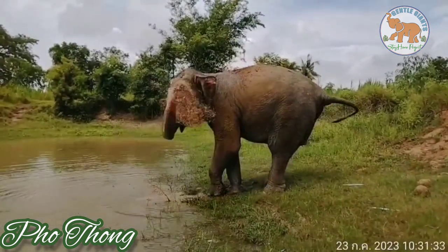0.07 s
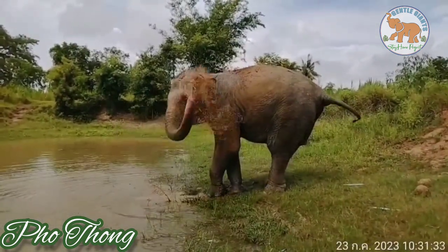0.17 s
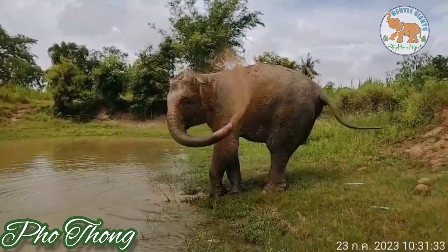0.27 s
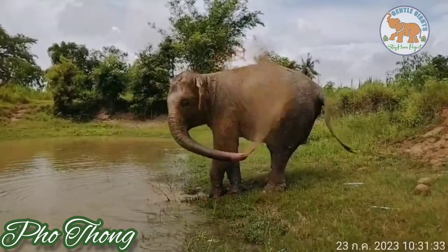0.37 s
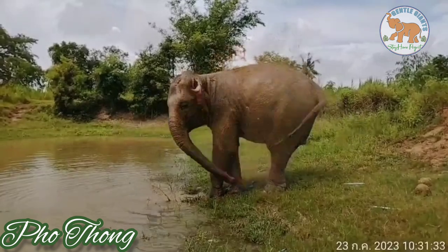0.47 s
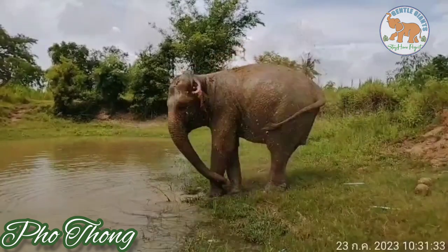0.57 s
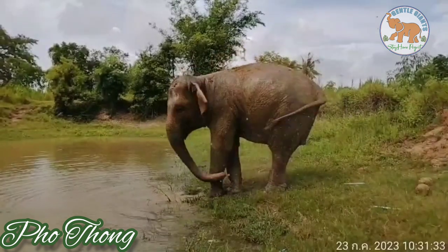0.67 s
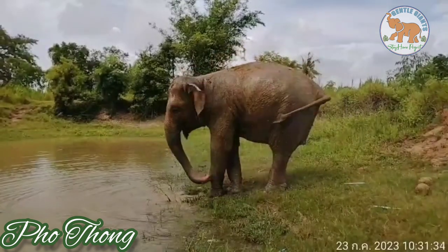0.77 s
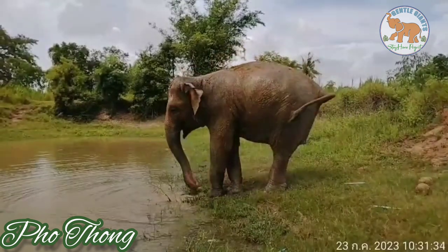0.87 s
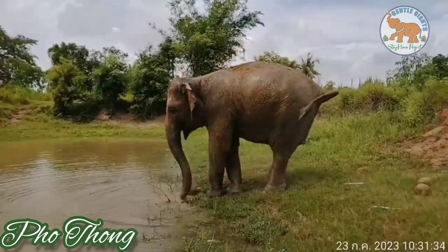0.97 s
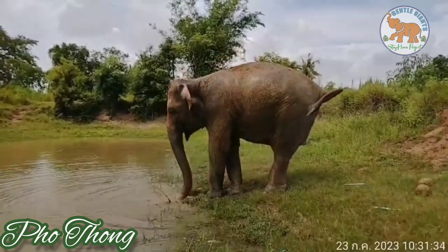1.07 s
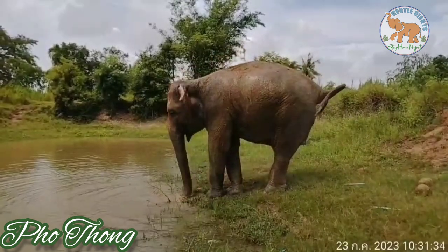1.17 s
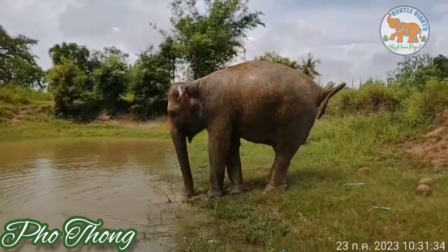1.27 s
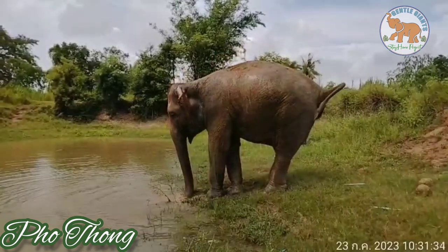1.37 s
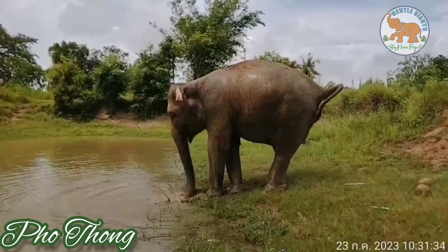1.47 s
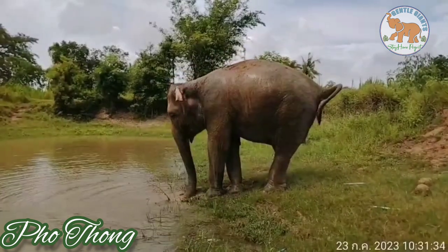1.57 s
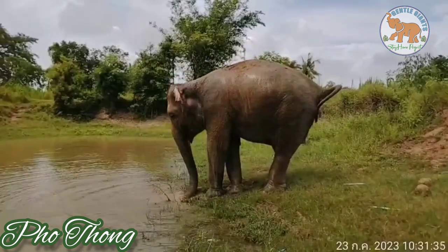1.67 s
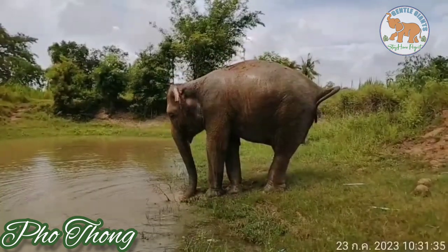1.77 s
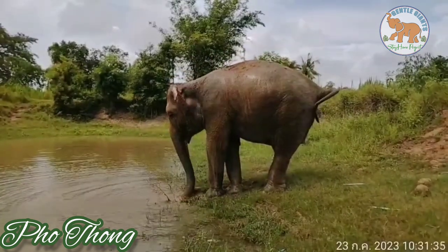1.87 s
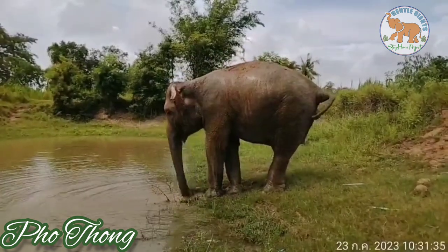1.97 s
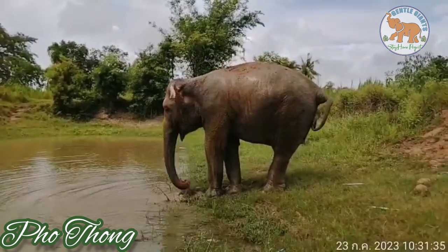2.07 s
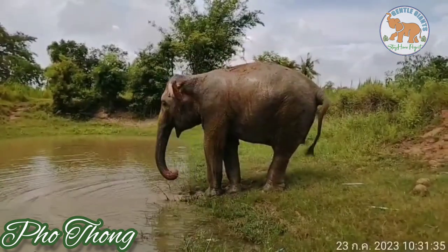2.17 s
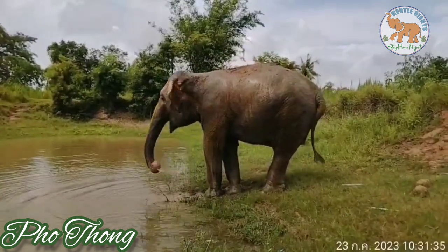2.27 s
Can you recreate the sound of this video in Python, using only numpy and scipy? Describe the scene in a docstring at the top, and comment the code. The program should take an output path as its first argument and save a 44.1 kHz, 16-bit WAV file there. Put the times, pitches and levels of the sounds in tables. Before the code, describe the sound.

Water splashes from an elephant's trunk: a soft gush, a sudden bright burst of spray, pattering drops, then wet slaps and sloshes in pond shallows, thinning to drips and a final small swish, outdoors, fairly close.

```python
"""Edge of a pond: an elephant flings muddy water over its back, a gush and then spray pattering down.
Its trunk slaps into the shallows, sloshes and dribbles there, and lifts with a last swish.
Water is random droplet clicks, shaped noise and short bubble rings; slaps and drips add ringing air pockets.
One sharp tick of damped modes sounds close by; wind is low noise over a faint hiss."""
import sys
import numpy as np
from scipy import signal
from scipy.fft import rfft, irfft
from scipy.io import wavfile

SR = 44100
rng = np.random.default_rng(int(sys.argv[2]) if len(sys.argv) > 2 else 0)


def wrap_up_sound(samples):
    """Save the sound to the file named by the first command line argument, as 16-bit audio."""
    columns = np.atleast_2d(samples).T
    # keep every value between -1 and 1, then stretch to whole-number steps
    tamed = np.clip(columns, -1, 1)
    steps = np.round(tamed * 32767).astype(np.int16)
    wavfile.write(sys.argv[1], SR, steps)


N = 101430
T = np.arange(N) / SR

# Spectrum of the mist that runs off. Each row: frequency in Hz, relative level in dB.
MIST_RUNOFF_COLOUR = [(3000, -25.5), (5600, -17), (6700, -7.5), (8000, 2), (9500, -4.5), (12000, -2.5),
                      (13300, -11), (14500, -5.5)]
# Spectrum of the coarser drops. Each row: frequency in Hz, relative level in dB.
DROPS_COLOUR = [(1000, -15), (2000, -15.5), (2700, -8), (3300, -2.5), (3900, -1), (4700, -6.5),
                (5600, -14.5), (8000, -12)]

MIST_PER_S, DROPS_PER_S = 7000, 1500
SPLASH_RISE_S, SPLASH_FALL_S, SPLASH_TAIL_S, SPLASH_TAIL_DB = 0.0005, 0.001, 0.0093, -10.5
SLAP_LENGTH_S, SLAP_FALL_S, SLAP_TAIL_S, SLAP_TAIL_DB = 0.0032, 0.0031, 0.023, -8.5
GRAIN_SPREAD_DB, SMOOTH_SHARE = 3.2, 0.45
CLUMP_DB, CLUMPS_PER_S, CLUMP_BANDS = 2.6, 60, 30
PLINKS_PER_S, PLINK_CYCLES, PLINK_SHARE = 500, 19, 0.16
BUBBLES_PER_S, BUBBLE_CYCLES, BUBBLE_SHARE = 450, 24, 0.9
CRACKLE_DB, CRACKLE_PER_S = 1.4, 220
WIDTH_DB, WIDE_ABOVE_HZ, WIDE_BELOW_HZ = -3, 6980, 12400
ECHO_SHARE = 0.43
HOLLOW_WIDTH_HZ = 85  # rate of the random amplitude knots
CAVITY_T60_S, CAVITY_RISE_PER_S = 0.036, 1.5
DRIP_T60_S, DRIP_RISE_PER_S = 0.014, 12
JET_S, JET_LENGTH_S, JET_DB = 0.276, 0.024, -29
TICK_S = 2.0542
AIR_DB = -76
CUTOFF_HZ = 14300


def from_db(db):
    """Decibels to amplitude gain."""
    return 10 ** (np.asarray(db) / 20)


def rms_one(x):
    """Scale to unit power."""
    return x / np.sqrt(np.mean(x ** 2) + 1e-20)


def gains(rows):
    """Each dB column of a curve as a gain per sample."""
    s, *columns = np.transpose(rows)
    return [from_db(np.interp(T, s, db)) for db in columns]


def coloured(x, points):
    """Filter a steady texture by a dB curve over log frequency; unit power."""
    hz, db = np.transpose(points)
    f = np.maximum(np.arange(N // 2 + 1) * SR / N, 1)
    gain = from_db(np.interp(np.log(f), np.log(hz), db))
    return rms_one(irfft(rfft(x) * gain, N))


def ring(clicks, hz, t60):
    """Two-pole resonator: a unit click starts a dying cosine of height 1."""
    r = from_db(-60 / (t60 * SR))
    w = 2 * np.pi * hz / SR
    return signal.lfilter([1, -r * np.cos(w)], [1, -2 * r * np.cos(w), r * r], clicks + 1e-18)


def click(s):
    """One unit click at a time in seconds."""
    return 1.0 * (np.arange(N) == int(s * SR))


def impacts(per_s):
    """Random clicks of uneven size and either sign; unit power."""
    sizes = from_db(GRAIN_SPREAD_DB * np.minimum(rng.exponential(1, N), 4))
    signs = rng.choice([-1, 1], N)
    hits = rng.random(N) < per_s / SR
    return rms_one(sizes * signs * hits)


def clumped(x):
    """Drops of one size arrive in clumps: each band swells and sinks by chance."""
    root_hz = np.sqrt(np.arange(N // 2 + 1) / (N // 2))
    centres = np.linspace(0, 1, num=CLUMP_BANDS)
    knots = np.arange(0, N / SR + 1, 1 / CLUMPS_PER_S)
    spectrum = rfft(x)
    out = 0
    for centre in centres:
        weight = np.maximum(1 - abs(root_hz - centre) / centres[1], 0)
        band = irfft(spectrum * weight, N)
        shift_s = rng.random() / CLUMPS_PER_S
        swell = np.interp(T + shift_s, knots, rng.standard_normal(len(knots)))
        out = out + band * from_db(CLUMP_DB * swell)
    return out


def bubbles(per_s, low_hz, high_hz, cycles):
    """Small bubbles ring at scattered pitches, losing 60 dB in a set number of cycles; unit power."""
    pitches = np.geomspace(low_hz, high_hz, num=64)
    clicks = impacts(per_s)
    dealt = rng.integers(0, len(pitches), N)
    return rms_one(sum(np.sqrt(hz) * ring(clicks * (dealt == k), hz, cycles / hz)
                       for k, hz in enumerate(pitches)))


def widen(mid, side):
    """Add a treble-only side signal with opposite signs in the two ears."""
    high = signal.butter(8, WIDE_ABOVE_HZ, "high", fs=SR, output="sos")
    low = signal.butter(2, WIDE_BELOW_HZ, fs=SR, output="sos")
    side = signal.sosfilt(low, signal.sosfilt(high, side))
    return mid + from_db(WIDTH_DB) * side * np.array([[1], [-1]])


def patter(per_s, colour):
    """Droplet impacts and tiny plinks over a smooth hiss, wide in the treble."""
    def one():
        grains = clumped(impacts(per_s) + SMOOTH_SHARE * rng.standard_normal(N))
        plinks = bubbles(PLINKS_PER_S, 2600, 13400, PLINK_CYCLES)
        return coloured(rms_one(grains) + PLINK_SHARE * plinks, colour)
    return widen(one(), one())


def burst(s, length, fall_s, tail_s, tail_db):
    """Envelope: quick rise, hold, quick exponential fall and a weaker long tail."""
    after = np.maximum(T - s - length, 0)
    tail = from_db(tail_db)
    rise = np.clip((T - s) / SPLASH_RISE_S + 0.5, 0, 1)
    return rise * ((1 - tail) * np.exp(-after / fall_s) + tail * np.exp(-after / tail_s))


def cavity(s, hz, db, t60, rise=0):
    """A dying sine, as of a closing air pocket, its pitch rising by a share per second."""
    age = np.maximum(T - s, 0)
    return from_db(db - 60 * age / t60) * np.sin(2 * np.pi * hz * age * (1 + rise * age / 2))


def ground_echo(x):
    """One ground reflection combs x, its delay following the trunk's tip, gone once down; unit power."""
    # Each row: time in seconds, comb spacing (1 / delay) in Hz.
    comb_rows = [(.11, 560), (.24, 362), (.33, 488), (.48, 610), (0.559, 1200)]
    s, hz = np.transpose(comb_rows)
    delay_s = 1 / np.interp(T, s, hz)
    echo = np.interp(T - delay_s, T, x)
    return rms_one(x + ECHO_SHARE * (T < s[-1]) * echo)


def wind():
    """Moving air rumbles low on the microphone, over a faint steady outdoor hiss."""
    # Rumble level. Each row: time in seconds, level in dB.
    wind_rows = [(0, -62.5), (.13, -71), (.24, -56.5), (.55, -56.5), (.8, -64), (1.35, -66), (1.7, -77.5)]
    # Rumble spectrum. Each row: frequency in Hz, relative level in dB.
    wind_colour = [(15, -4.5), (70, 2), (110, -6.5), (400, -21.5), (1500, -100)]
    # Hiss spectrum. Each row: frequency in Hz, relative level in dB.
    air_colour = [(100, -6), (400, -7), (2000, -5), (4500, 3), (14000, -6)]
    level, = gains(wind_rows)
    rumble = level * coloured(rng.standard_normal(N), wind_colour)
    hiss = from_db(AIR_DB) * coloured(rng.standard_normal(N), air_colour)
    return rumble + hiss


def tick():
    """One dry close tick: heavily damped modes struck by a single click."""
    # Each row: mode frequency in Hz, level in dB, t60 in seconds.
    tick_modes = [(580, -30.5, 0.0058), (7860, -29.5, 0.00085), (12100, -34, 0.00081)]
    return sum(from_db(db) * ring(click(TICK_S), hz, t60) for hz, db, t60 in tick_modes)


def hollow():
    """A faint, rough, wavering whistle: sine and cosine under fast random amplitudes."""
    # Each row: time in seconds, pitch in Hz, level in dB.
    hollow_rows = [(.56, 1340, -88), (.62, 1330, -65), (.71, 1350, -63.5), (.8, 1279, -70),
                   (.95, 1100, -84.5), (1.111, 1400, -64), (1.151, 1205, -71), (1.21, 1245, -60),
                   (1.32, 1335, -71.5), (1.4, 1340, -99)]
    s, hz, db = np.transpose(hollow_rows)
    knots = T[::SR // HOLLOW_WIDTH_HZ]
    phase = 2 * np.pi * np.cumsum(np.interp(T, s, hz)) / SR
    note = sum(np.interp(T, knots, rng.standard_normal(len(knots))) * wave(phase)
               for wave in (np.sin, np.cos))
    return from_db(np.interp(T, s, db)) * rms_one(note)


def drips():
    """Lone drops each trap one bubble: a short, rising blip."""
    # Each row: start in seconds, starting pitch in Hz, level in dB.
    drip_rows = [(1.401, 590, -56), (1.57, 1040, -63), (1.728, 3090, -49.5), (1.974, 3070, -57),
                 (2.281, 860, -57.5)]
    return sum(cavity(*row, DRIP_T60_S, DRIP_RISE_PER_S) for row in drip_rows)


def thuds():
    """Low thuds as dying sines: one under the slap, then a deeper one like a footfall."""
    # Each row: start in seconds, pitch in Hz, level in dB, t60 in seconds.
    thud_rows = [(0.6437, 115, -35, 0.1), (1.337, 39.5, -53, 0.36)]
    return sum(cavity(*row) for row in thud_rows)


def slaps():
    """The trunk meets the water: dull noise smacks and ringing air pockets."""
    # Smacks. Each row: start in seconds, level in dB.
    slap_rows = [(0.6435, -45), (0.656, -48.5), (1.123, -50), (1.2395, -47.5), (1.304, -56.5),
                 (1.997, -67.5)]
    # Smack spectrum. Each row: frequency in Hz, relative level in dB.
    slap_colour = [(60, -15), (280, -1.5), (1500, -4.5), (8000, -29)]
    # Air pockets closed by the slaps. Each row: start in seconds, starting pitch in Hz, level in dB.
    cavity_rows = [(.6455, 934, -36.5), (0.665, 2280, -39), (1.1235, 655, -40.5), (1.1235, 1145, -44),
                   (1.125, 1590, -39), (1.2375, 1306, -42.5), (1.239, 292, -38.5), (1.996, 1624, -55.5)]
    smack = coloured(clumped(rng.standard_normal(N)), slap_colour)
    level = sum(from_db(db) * burst(s, SLAP_LENGTH_S, SLAP_FALL_S, SLAP_TAIL_S, SLAP_TAIL_DB)
                for s, db in slap_rows)
    pockets = sum(cavity(*row, CAVITY_T60_S, CAVITY_RISE_PER_S) for row in cavity_rows)
    return level * smack + pockets


def splashes():
    """Small splashes: droplets so tightly clumped that they fuse into bursts of noise."""
    # Each row: start in seconds, length in seconds, mist level in dB, coarser drops level in dB.
    splash_rows = [(0.615, 0.0061, -41, -44), (0.634, 0.023, -41, -41), (0.663, 0.0024, -50, -41.5),
                   (0.846, .002, -41, -61), (0.919, 0.0031, -53, -50), (0.9625, .003, -39.5, -61),
                   (0.968, 0.0023, -39.5, -64), (1.022, 0.0025, -58, -47), (1.032, 0.0048, -44, -62),
                   (1.106, .006, -40.5, -42.5), (1.115, 0.0022, -34, -42.5), (1.125, 0.013, -46, -54),
                   (1.166, .0036, -41.5, -54), (1.179, 0.0017, -50, -48), (1.2227, 0.0036, -46, -44),
                   (1.237, 0.017, -56, -50), (1.286, 0.0029, -42.5, -61), (1.333, 0.0017, -41, -48),
                   (1.478, 0.0067, -59, -58), (1.657, 0.0043, -59.5, -60.5), (1.725, 0.0068, -57.5, -56),
                   (1.995, 0.015, -73, -56), (2.179, 0.021, -71, -61)]
    fine, coarse = [widen(*[coloured(x, colour) for x in rng.standard_normal((2, N))])
                    for colour in (MIST_RUNOFF_COLOUR, DROPS_COLOUR)]
    out = 0
    for s, length, mist_db, drops_db in splash_rows:
        envelope = burst(s, length, SPLASH_FALL_S, SPLASH_TAIL_S, SPLASH_TAIL_DB)
        out = out + envelope * (from_db(mist_db) * fine + from_db(drops_db) * coarse)
    return out


def gush():
    """Churning water: short bubble rings on a bed of splatter, combed by the ground echo."""
    # Each row: time in seconds, level in dB.
    gush_rows = [(0, -57.5), (.08, -50.5), (.135, -56), (.19, -48), (.34, -51.5), (.51, -51), (.59, -60.5),
                 (.66, -54), (.8, -74), (1.1, -64.5), (1.3, -68.5), (1.6, -87), (1.96, -91), (2.02, -71.5)]
    # Spectrum. Each row: frequency in Hz, relative level in dB.
    gush_colour = [(60, -19), (170, 4.5), (330, -6), (520, -2), (1800, -1.5), (2300, -5), (4000, -14.5)]
    level, = gains(gush_rows)
    rings = coloured(bubbles(BUBBLES_PER_S, 450, 2216, BUBBLE_CYCLES), gush_colour)
    splatter = coloured(clumped(impacts(DROPS_PER_S)), gush_colour)
    return level * ground_echo(BUBBLE_SHARE * rings + splatter)


def spray():
    """Thrown water rains down as mist and coarser drops, then thins to an uneven, crackling dribble."""
    # Thrown. Each row: time in seconds, mist level in dB, coarser drops level in dB, before crackle.
    spray_rows = [(0, -59.5, -56.5), (.12, -51.5, -49.5), (.243, -48.5, -49.5), (.257, -31.5, -38.5),
                  (.298, -34, -37.5), (.315, -36, -42.5), (.385, -37, -43), (.45, -42.5, -47),
                  (.54, -43, -44.5), (.595, -39.5, -52.5), (.65, -40.5, -43), (.72, -52.5, -61)]
    # Run-off. Each row: time in seconds, mist level in dB, coarser drops level in dB, before crackle.
    runoff_rows = [(.76, -53, -58.5), (.92, -51, -64.5), (1.05, -50, -58.5), (1.14, -45, -55.5),
                   (1.2, -52, -57), (1.31, -52.5, -61), (1.45, -64, -68.5), (1.7, -71, -79),
                   (1.95, -75.5, -83), (2.04, -61.5, -73.5), (2.11, -60.5, -65.5), (2.18, -53, -61),
                   (2.3, -71.5, -71.5)]
    # Thrown mist spectrum. Each row: frequency in Hz, relative level in dB.
    thrown_colour = [(3000, -24), (5600, -15), (6500, -7.5), (7400, 0), (9500, -2.5), (13000, 0.5),
                     (14500, -14)]
    mist, drops = gains(list(spray_rows) + list(runoff_rows))
    thrown = np.interp(T, [0.55, 0.8], [1, 0])
    fine = np.sqrt(thrown) * patter(MIST_PER_S, thrown_colour)
    fine = fine + np.sqrt(1 - thrown) * patter(MIST_PER_S, MIST_RUNOFF_COLOUR)
    knots = np.arange(0, N / SR + 1, 1 / CRACKLE_PER_S)
    jumps = np.minimum(rng.exponential(1, len(knots)), 4) - 1
    crackle = from_db(CRACKLE_DB * (1 - thrown) * np.interp(T, knots, jumps))
    return crackle * (mist * fine + drops * patter(DROPS_PER_S, DROPS_COLOUR))


def jet():
    """The blast from the trunk peaks in a short, very bright hiss of droplets."""
    # Each row: frequency in Hz, relative level in dB.
    jet_colour = [(4000, -29), (8500, -5), (11500, 5), (14500, -7)]
    envelope = burst(JET_S, JET_LENGTH_S, SLAP_FALL_S, SPLASH_TAIL_S, SPLASH_TAIL_DB)
    return from_db(JET_DB) * envelope * patter(MIST_PER_S, jet_colour)


def scene():
    """Sum of all sources: jet, spray and splashes are wide in the treble, the rest central."""
    quiet = wind() + tick() + hollow() + drips()
    return quiet + thuds() + slaps() + splashes() + gush() + spray() + jet()


def record(dry):
    """Steep elliptic low-pass cuts the top."""
    return signal.sosfilt(signal.ellip(12, 0.2, 70, CUTOFF_HZ, fs=SR, output="sos"), dry)


dry = scene()
out = record(dry)
wrap_up_sound(out)
```